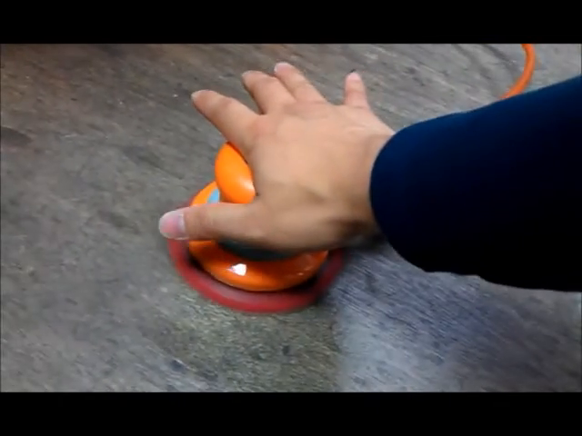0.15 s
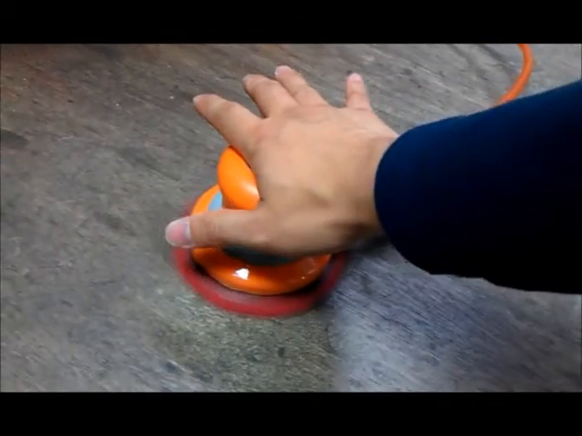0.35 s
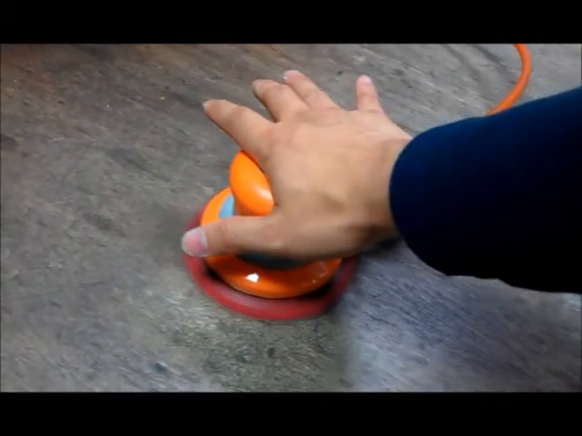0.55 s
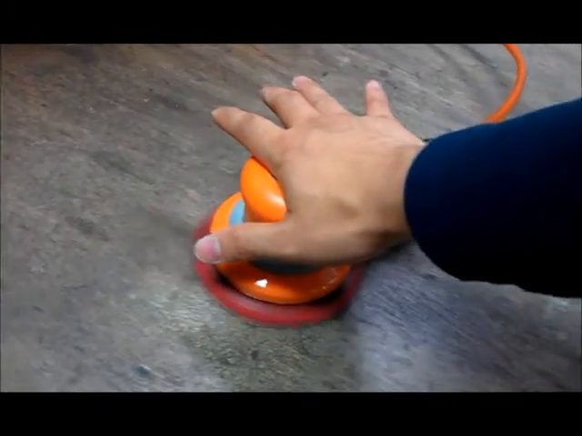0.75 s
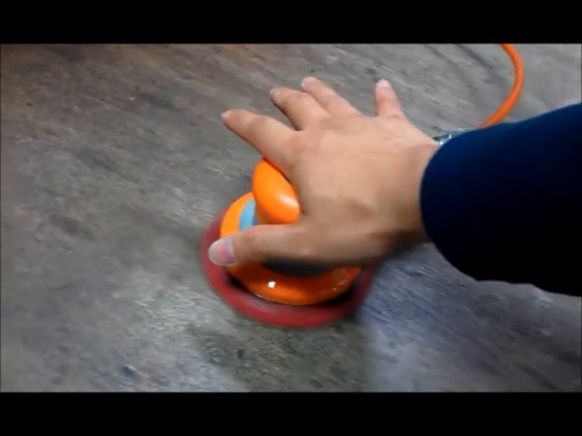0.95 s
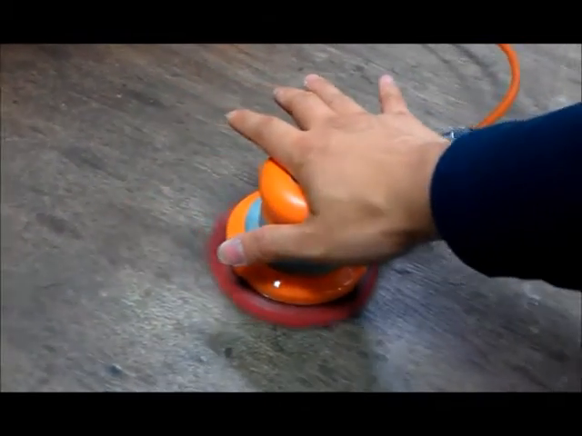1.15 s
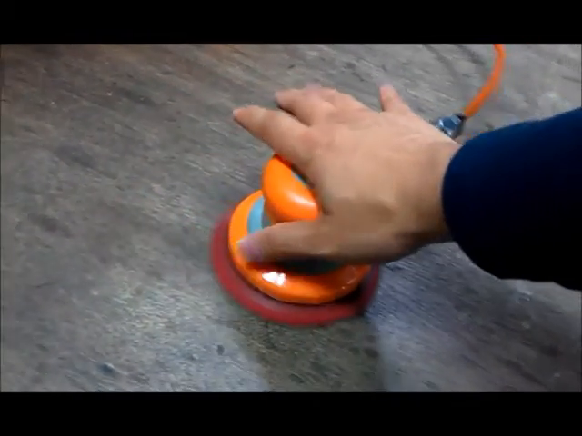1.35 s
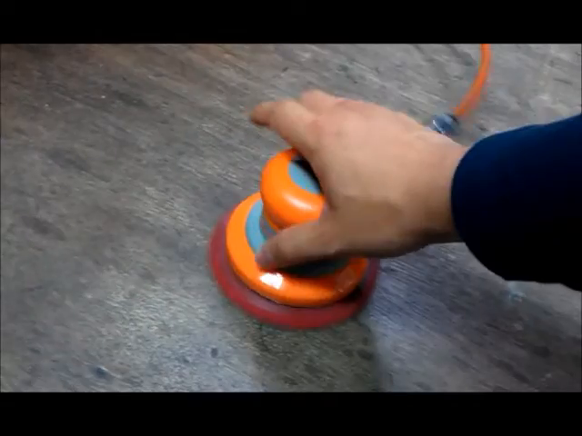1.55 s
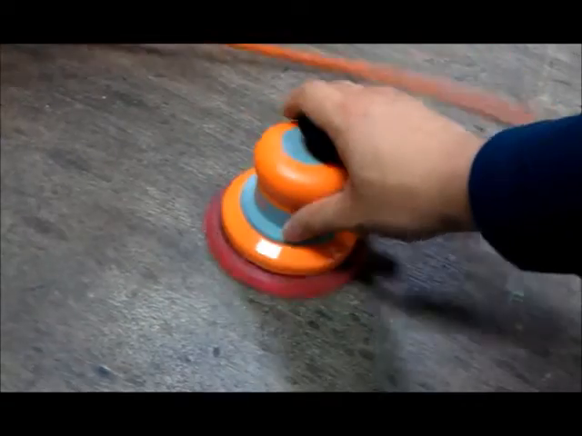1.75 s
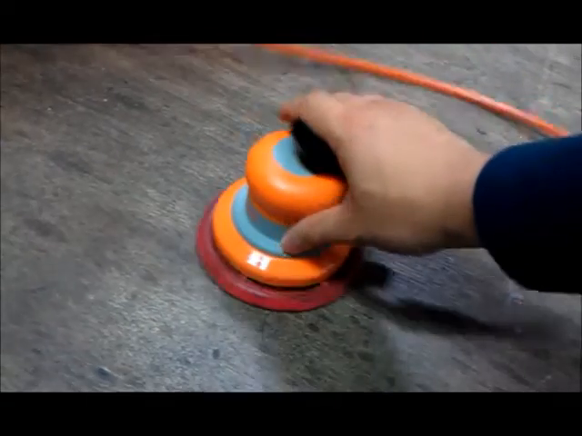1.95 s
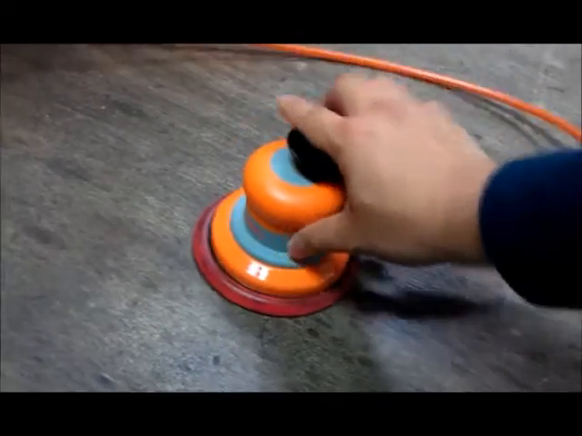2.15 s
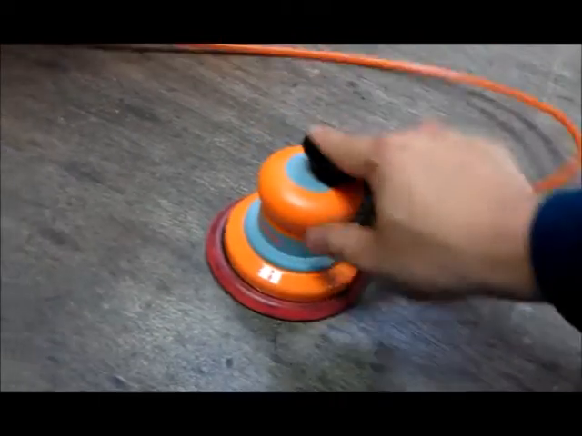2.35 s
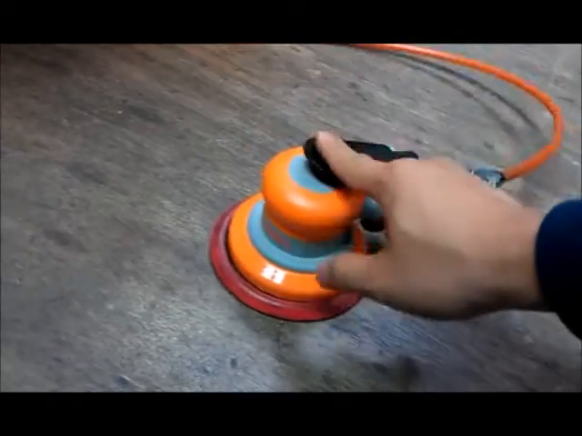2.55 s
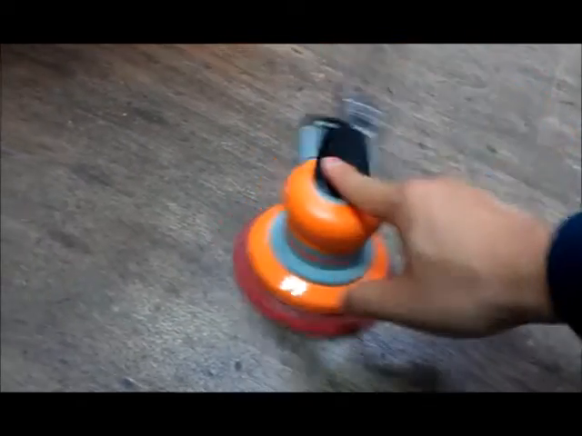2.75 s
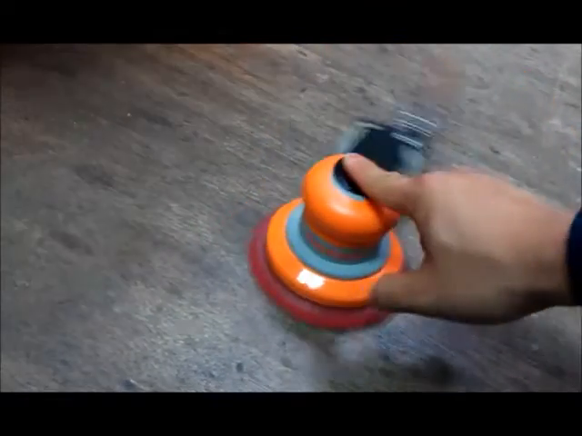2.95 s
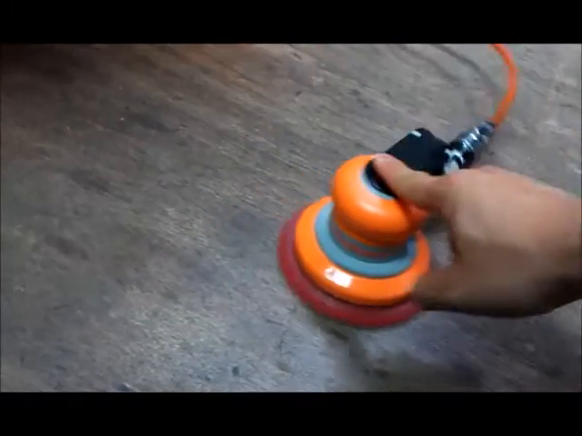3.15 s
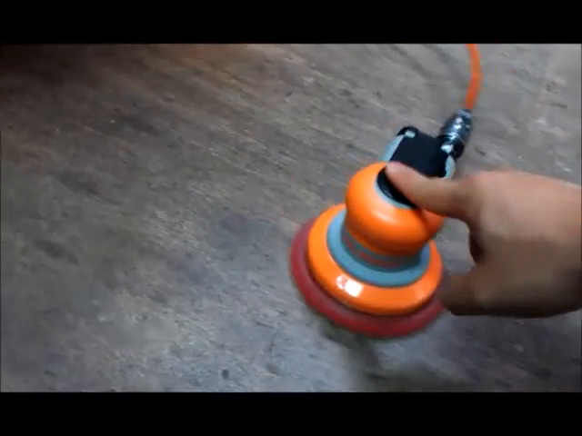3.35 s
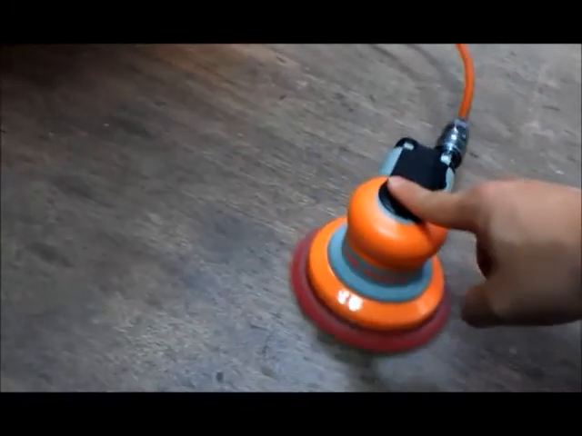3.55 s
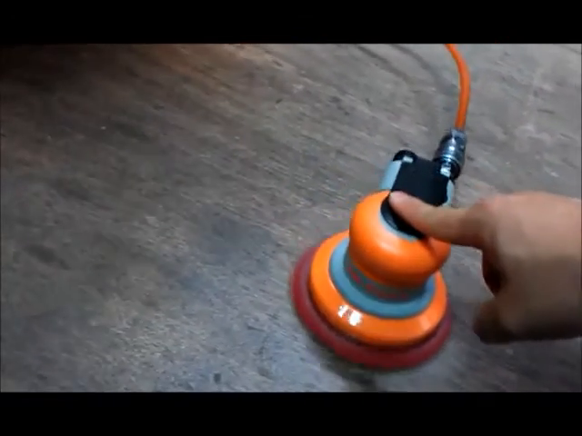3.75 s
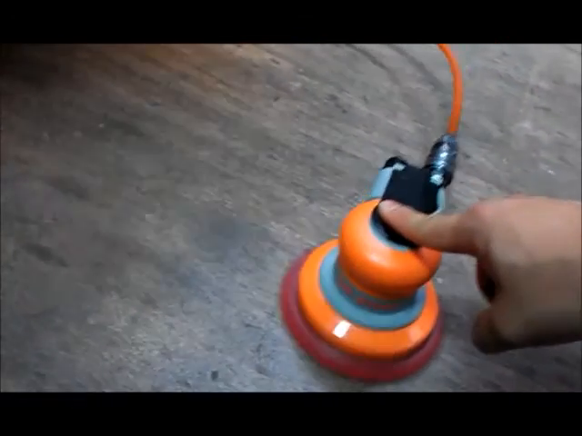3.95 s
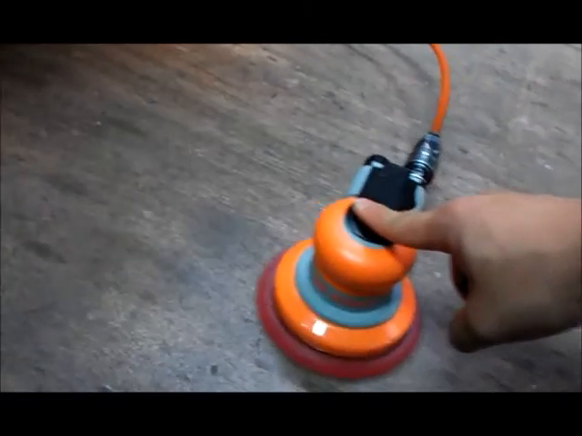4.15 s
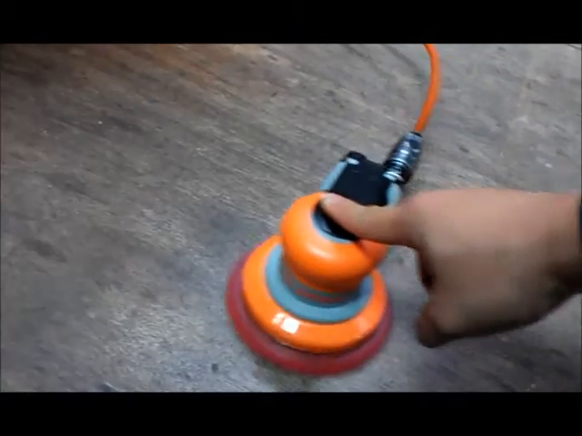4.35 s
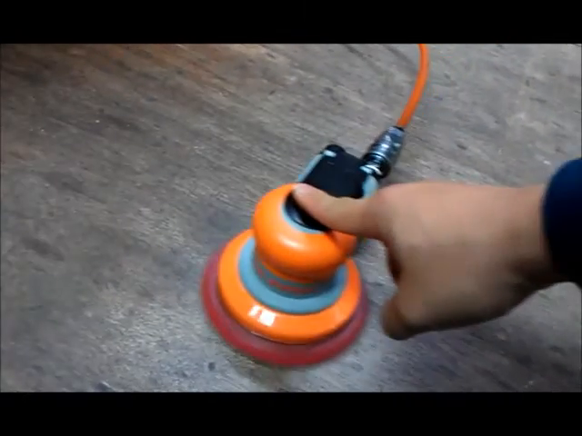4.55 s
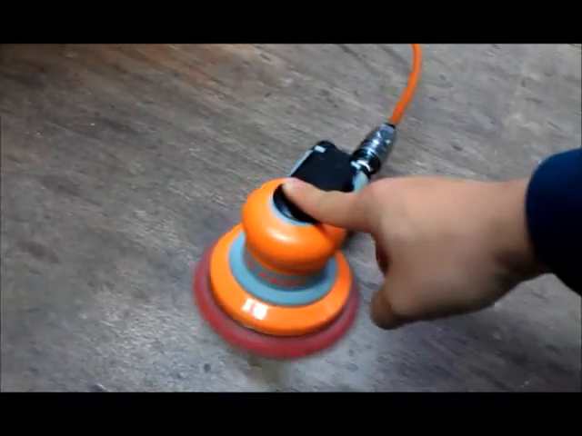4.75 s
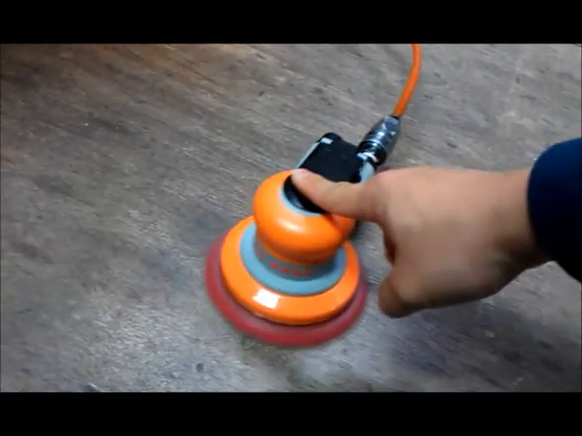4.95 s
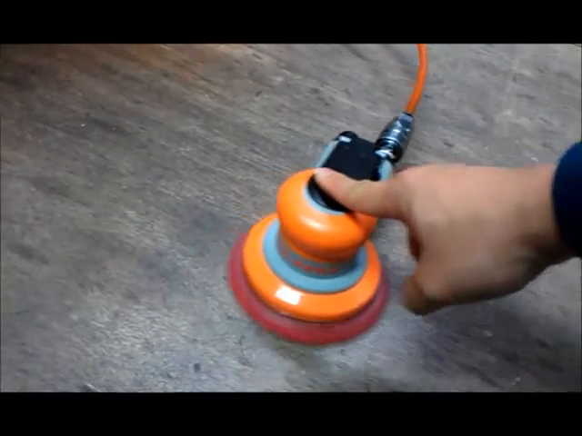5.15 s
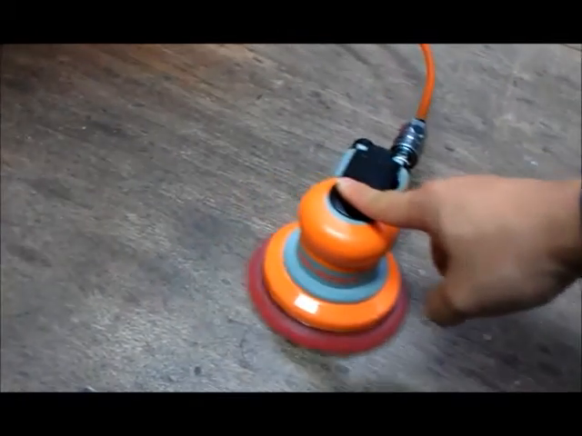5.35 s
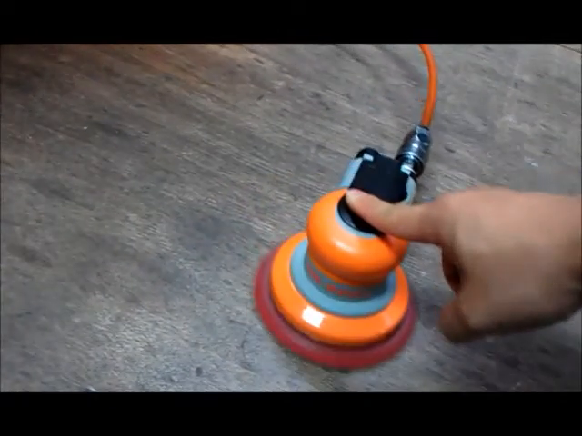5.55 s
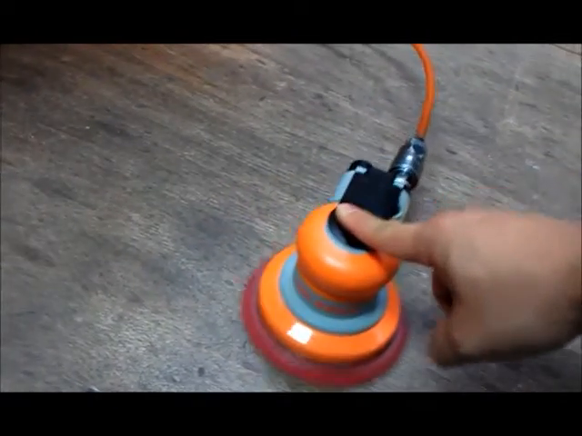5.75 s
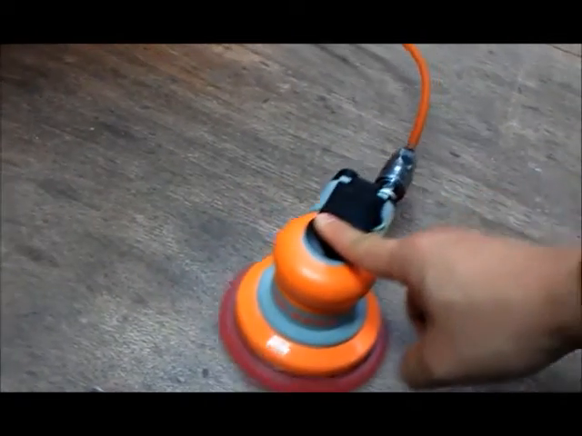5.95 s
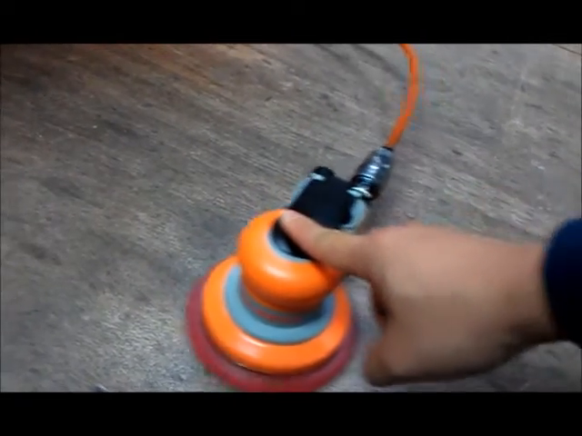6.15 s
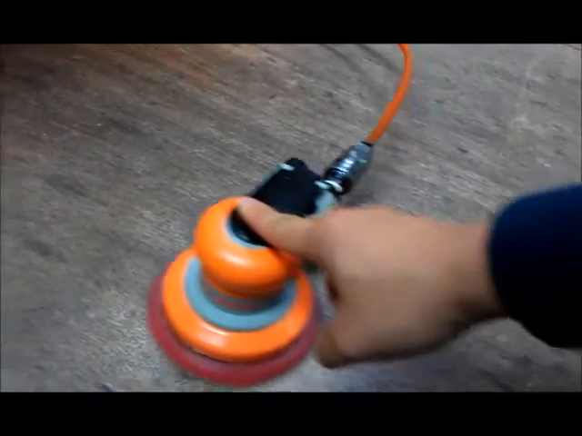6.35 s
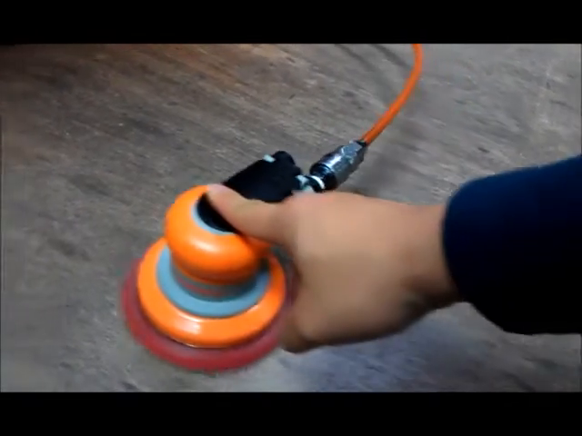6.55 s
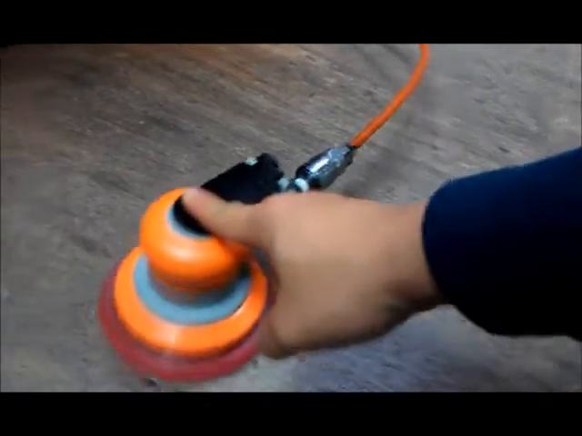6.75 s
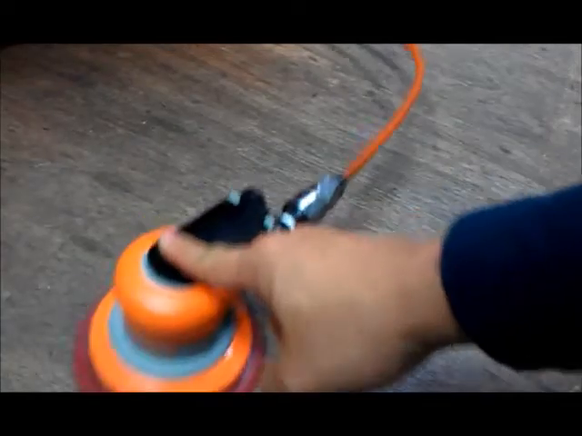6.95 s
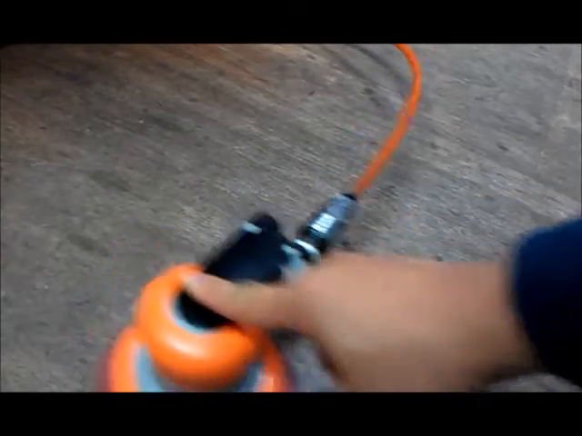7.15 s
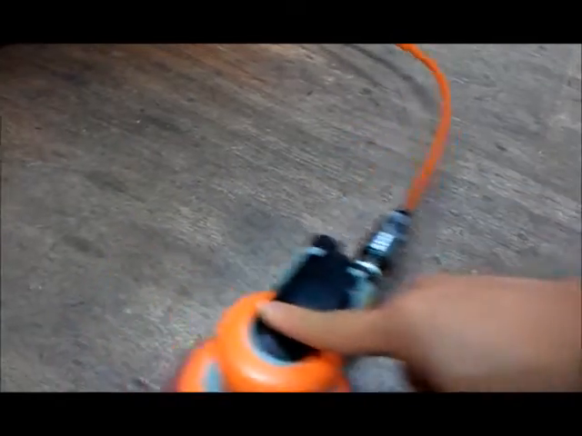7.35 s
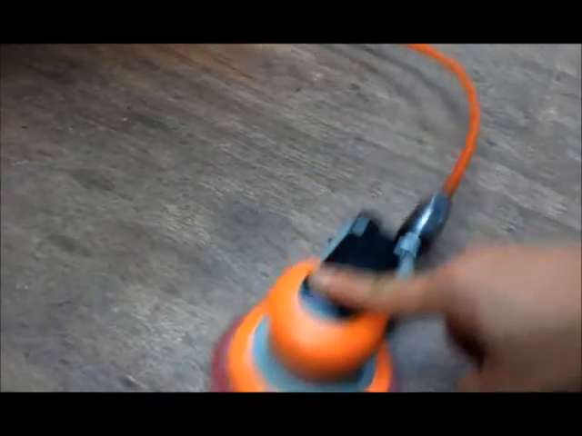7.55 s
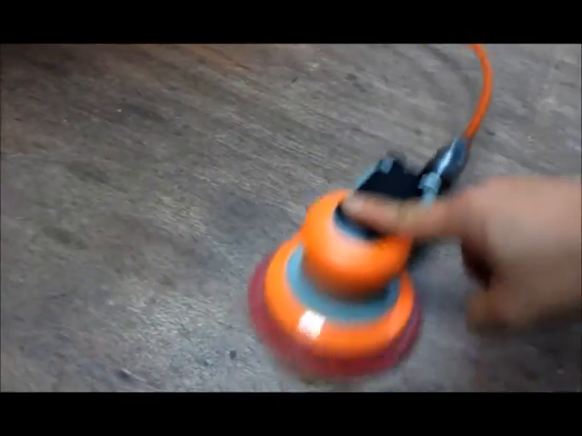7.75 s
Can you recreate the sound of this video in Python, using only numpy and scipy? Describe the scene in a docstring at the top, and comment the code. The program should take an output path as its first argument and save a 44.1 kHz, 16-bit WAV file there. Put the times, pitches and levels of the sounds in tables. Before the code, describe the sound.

A handheld air-powered orbital sander is heard close up on a wooden surface in a workshop, with the same sound on both channels. From 0 to 1.6 s it runs steadily: a whine near 800 Hz with overtones, a rough buzz and low hum at about 160 Hz, metallic bearing tones, bright exhaust hiss and soft scrubbing. Tone colour shifts slightly as the tool moves. At 1.6 s the lever is released; hiss and pitch fall fast, becoming a loose, rattling chug with ticks around 1.9 to 2.05 s, stopping by about 2.2 s. Only faint leaking air and room tone remain. At 2.6 s air returns, small clicks and sharper knocks come between 2.67 and 2.82 s, and the motor rattles and sweeps up to full speed by about 2.9 s. It then whines and hisses steadily until the cut at about 8 s, with gentle wavering and brief whistly swells.

```python
"""A whine over exhaust hiss: a palm-sized pneumatic orbital sander on a wooden bench, heard close by in a workshop.
The whine is summed vane-rate harmonics, the hiss is coloured noise pulsing with the shaft.
The off-centre pad hums and scrubs the wood once a turn; buzz and bearing tones follow the same shaft phase.
The lever is let go, the motor chugs and ticks to a stop, and a second after the release it is started again."""
import sys
import numpy as np
from scipy import signal
from scipy.fft import rfft, irfft, next_fast_len
from scipy.io import wavfile
from scipy.ndimage import map_coordinates

SR = 44100
rng = np.random.default_rng(int(sys.argv[2]) if len(sys.argv) > 2 else 0)


def unload_wav(signal):
    """Save mono or channel-first audio to the path in sys.argv[1] as 16-bit WAV at rate SR, clipped to [-1, 1]."""
    wavfile.write(
        sys.argv[1],
        SR,
        np.round(np.clip(np.atleast_2d(signal).T, -1, 1) * 32767).astype(np.int16),
    )


N = 343539
TIME_S = np.arange(N) / SR
VANES = 5


def undb(db):
    """Decibels to gain."""
    return 10 ** (np.asarray(db) / 20)


def unit(x):
    """Scale to rms 1."""
    return x / np.sqrt(np.mean(x ** 2))


def curves(table):
    """Each column of a timed table, sample by sample."""
    t_s, *columns = np.transpose(table)
    return [np.interp(TIME_S, t_s, column) for column in columns]


def spectrum_at(points, hz):
    """Read (Hz, dB) points on a log-frequency axis."""
    f_hz, db = np.transpose(points)
    return np.interp(np.log(np.maximum(hz, 1)), np.log(f_hz), db)


def noise(points):
    """Noise of a given colour, rms 1."""
    size = next_fast_len(N, True)
    gain = undb(spectrum_at(points, np.fft.rfftfreq(size, 1 / SR)))
    white = rng.standard_normal(size)
    return unit(irfft(rfft(white) * gain, size)[:N])


def walk(rate_hz):
    """Smooth chance that changes about rate_hz times a second; spread near 1."""
    steps = rng.standard_normal(4096)
    coarse_s = TIME_S[::64]
    smooth = map_coordinates(steps, [coarse_s * rate_hz], order=3, mode="wrap")
    return np.interp(TIME_S, coarse_s, smooth)


RELEASE_S, PRESS_S, VALVE_OPENS_S = 1.61, 2.62, 0.14
# coasting: pressure fade, slowing time constant, dry friction (share of full speed) that ends it
EASE_S, COAST_S, FRICTION = .009, .15, .025
# S-curve run-up: press to half speed, time constant
HALF_SPEED_S, RUN_UP_S = .121, .033


def throttle():
    """Shares of full speed and full air flow: both die away after the release and return with the press."""
    since_s = EASE_S * np.logaddexp(0, (TIME_S - RELEASE_S) / EASE_S)
    coast = np.maximum(np.exp(-since_s / COAST_S) - FRICTION, 0) / (1 - FRICTION)
    run_up = (1 + np.tanh((TIME_S - PRESS_S - HALF_SPEED_S) / (2 * RUN_UP_S))) / 2
    valve = np.clip((TIME_S - PRESS_S) / VALVE_OPENS_S, 0, 1)
    pace = np.where(TIME_S < PRESS_S, coast, run_up)
    flow = coast ** 1.03 + valve ** 2.4
    return pace, flow


# shaft speed with the valve open, following the load on the pad: t/s, f/Hz
OPEN_SPEED = [(0.0, 159.5), (0.55, 160.0), (0.8, 159.4), (1.1, 160.2), (1.5, 160.0), (3.1, 158.7),
              (3.85, 159.5), (4.35, 159.8), (4.7, 160.6), (5.3, 160.1), (5.85, 160.9), (6.4, 161.0),
              (6.6, 160.4), (7.1, 160.7), (7.75, 160.6)]


def shaft_hz(pace):
    """Loaded open-valve speed, scaled by the share of full speed."""
    open_hz, = curves(OPEN_SPEED)
    return open_hz * pace


# vanes passing the exhaust port, as the tool is steered: t/s, 1st, 2nd, 3rd harmonic mean level/dB
VANE_WHINE = [(0.0, -31, -37.5, -42), (0.5, -33.5, -38.5, -45), (1.0, -38, -41, -43),
              (1.5, -34.5, -39, -56), (2.95, -34.5, -37, -47), (3.7, -33.5, -33.5, -40.5),
              (4.25, -36, -37, -42), (4.75, -35, -43.5, -42.5), (5.5, -35, -35.5, -41),
              (6.1, -38.5, -42.5, -48), (6.55, -34, -37, -52), (7.05, -31.5, -53, -43.5),
              (7.4, -36, -35.5, -48), (7.75, -37, -36.5, -44.9)]


def whine(turns, pace, loose, waver_db=0.54):
    """The first harmonics of the vane rate, clean while air holds the vanes against the wall."""
    tones = np.zeros(N)
    for k, db in enumerate(curves(VANE_WHINE), 1):
        tones += undb(db + waver_db * walk(25)) * np.cos(2 * np.pi * VANES * k * turns + k)
    return np.sqrt(2) * tones * pace * (1 - loose)


# exhaust jet colour: f/Hz, relative level/dB per Hz
JET_COLOUR = [(300, -23), (900, -11.5), (1700, -5), (2200, -6.5), (2800, -3), (3400, -1.5), (4100, -2.5),
              (5000, -1.5), (6100, 1.5), (7200, -0.5), (8500, -4.5), (10500, -5), (12500, -10.5),
              (15500, -10)]
LEAK_DB = -70.5  # air seeping past the closed valve, below the split


def hiss(turns, flow, air_db, top_db, pulsing=0.1, split_hz=9500, top_trim_db=7.0, leak_top_db=9.0,
         jet_trim_db=-0.42, flicker_db=0.71):
    """The exhaust jet pulses with shaft and vanes; its top changes as the port turns, and a thin leak stays."""
    jet = noise(JET_COLOUR)
    low = signal.sosfiltfilt(signal.butter(3, split_hz, fs=SR, output="sos"), jet)
    top = jet - low
    # the pad rocks over two turns, so the load also beats at half the shaft rate
    puffs = 1 + pulsing * sum(np.cos(2 * np.pi * k * turns + k * k) for k in (.5, 1, 2, VANES))
    level = undb(air_db + jet_trim_db + flicker_db * walk(30))
    blast = (low + undb(top_db + top_trim_db) * top) * puffs * level
    leak = undb(LEAK_DB) * (low + undb(leak_top_db) * top)
    return flow * blast + leak


def hum(turns, pace, hum_db=-39.5):
    """The off-centre pad shakes the tool once a turn; force and radiation both fall away with speed."""
    radiated = pace ** 5
    return np.sqrt(2) * undb(hum_db) * radiated * np.sin(2 * np.pi * turns)


# pad on the wood: f/Hz, relative level/dB per Hz
SCRUB_COLOUR = [(30, -44), (90, -42), (260, -26), (360, -17), (480, -25.5), (620, -5), (830, -6.5),
                (1080, 2), (1220, -1), (1500, -4.5), (1800, -19), (3000, -25)]


def scrub(turns, scrub_db, throb=0.16, rocking=0.2, trim_db=-1.5, patchy_db=0.5):
    """The pad rubs the wood harder on one side of each orbit, and harder on every second turn."""
    pressure = 1 + throb * np.sin(2 * np.pi * turns) + rocking * np.sin(np.pi * turns)
    return noise(SCRUB_COLOUR) * pressure * undb(scrub_db + trim_db + patchy_db * walk(22))


# gap between port and bench picks out one shaft harmonic: start t/s, length/s, multiple of shaft speed, boost/dB
GAP_WHISTLES = [(-.3, 1, 36, 10.5), (0, 1.0, 28, 15), (3.3, 1.5, 40, 5.5), (3.55, .5, 38, 7),
                (4.45, 0.45, 36, 11.5), (5.0, .6, 38, 11), (5.55, .55, 40, 9.5), (5.6, 0.62, 21, 2.5),
                (5.8, 1.3, 36, 8), (7.3, 0.79, 40, 7)]


def whistle_db(k):
    """Boost of shaft harmonic k: each brief whistle swells and fades in one arch."""
    boost_db = 0
    for start_s, length_s, multiple, peak_db in GAP_WHISTLES:
        if round(multiple) == k:
            boost_db += peak_db * np.sin(np.pi * np.clip((TIME_S - start_s) / length_s, 0, 1))
    return boost_db


# exhaust puffs, one shaft harmonic before beam, whistles and swell: f/Hz, level/dB
PUFF_BUZZ = [(320, -69), (480, -59.5), (640, -56), (1000, -47), (1450, -51), (1800, -56), (2200, -59),
             (2600, -51), (3400, -46), (4300, -53), (6100, -45.5), (7500, -53), (11000, -66), (12200, -56),
             (15500, -60)]
# upper whine, all five vanes adding up, same reference: multiple of shaft speed, level/dB
UPPER_WHINE = [(20, -44), (25, -52), (30, -50), (35, -45), (40, -44), (45, -52), (50, -53), (55, -59),
               (60, -54), (65, -52), (70, -62), (75, -49), (80, -49), (85, -52), (90, -50.5), (95, -55)]
# how squarely the port beams its buzz at the listener: t/s, gain below split/dB, gain above split/dB
PORT_BEAM = [(0, -2.5, -1.5), (1.2, 1, -1), (2.95, -4, -2.5), (4.2, -1.5, 1), (5.9, 1, 0.5),
             (6.7, -3.5, -0.5), (7.75, -0.5, 0.5)]
BEAM_SPLIT_HZ = 4200


def buzz(turns, full_hz, swell_db=2.4, count=97):
    """Unequal vanes puff out shaft harmonics; each swells and fades as the tool slides on the reflecting bench."""
    angle = 2 * np.pi * ((turns + .0005 * walk(40)) % 1)
    overtones = dict(UPPER_WHINE)
    mid_db, treble_db = curves(PORT_BEAM)
    out = np.zeros(N)
    for k in range(2, count + 1):
        if k % VANES == 0 and k not in overtones:
            continue  # the lowest vane harmonics are the whine
        beam_db = mid_db if k * full_hz < BEAM_SPLIT_HZ else treble_db
        base_db = overtones.get(k, spectrum_at(PUFF_BUZZ, k * full_hz))
        level_db = base_db + beam_db + whistle_db(k) + swell_db * walk(1.8)
        phase = k * angle + 2 * np.pi * rng.random()
        out += undb(level_db.astype(np.float32)) * np.sin(phase.astype(np.float32))
    return np.sqrt(2) * out


# tones between the shaft harmonics: multiple of shaft speed, mean level at full speed/dB
BEARING_TONES = [(1.495, -64.5), (5.6, -62), (5.84, -51.5), (6.655, -47.5), (6.784, -47), (6.16, -69),
                 (7.38, -50), (8.51, -50.5), (9.1, -43), (13.8, -92), (19.96, -55), (20.16, -57),
                 (21.02, -60), (21.9, -48.5), (23.07, -47.5), (32, -66)]


def bearings(turns, slip_cycles=0.13, swell_db=1.0):
    """Rolling balls sing off the shaft harmonics and slip a little."""
    out = np.zeros(N)
    for ratio, db in BEARING_TONES:
        level = undb(db + swell_db * walk(1.98))
        out += level * np.sin(2 * np.pi * (ratio * turns + slip_cycles * walk(14)))
    return np.sqrt(2) * out


# chamber and housing resonances swept by the chug, before harmonic slope and chatter: f/Hz, level/dB
CHAMBER_RESONANCES = [(110, -47), (290, -37.5), (365, -21.5), (460, -32.5), (570, -22.5), (700, -19),
                      (880, -25), (1120, -10.5), (1370, -20), (1550, -21), (1750, -19), (2300, -23)]
DRIVEN_CHUG_DB = -6.5  # softer when air drives the vanes


def chug(turns, hz, pace, loose, slope_db_per_octave=-7.0, chatter_db=4.0, chatter_turns=0.011, count=3):
    """Loose vanes pump roughly; their harmonics glide through the chamber's resonances and fade with speed."""
    out = np.zeros(N)
    for k in range(1, count + 1):
        resonance_db = spectrum_at(CHAMBER_RESONANCES, k * VANES * hz)
        db = resonance_db + slope_db_per_octave * np.log2(k) + chatter_db * np.tanh(walk(110))
        slipped = turns + chatter_turns * walk(150)
        out += undb(db) * np.cos(2 * np.pi * VANES * k * slipped + k)
    return np.sqrt(2) * out * pace * loose * undb(DRIVEN_CHUG_DB * (TIME_S > PRESS_S))


# housing and pad modes: f/Hz, relative level/dB, t60/s
BODY_MODES = [(380, -13, .03), (680, -10, .025), (1060, 0, .04), (1190, -1, .04), (1330, -8, .03),
              (2600, -9, .012), (3400, -9, .015)]


def body_ring(contact_s=.001):
    """What housing and pad ring with after one slightly cushioned blow, peak 1."""
    t = TIME_S[:SR // 10]
    ring = np.zeros(len(t))
    for hz, db, t60_s in BODY_MODES:
        ring += undb(db) * np.sin(2 * np.pi * hz * t) * np.exp(-np.log(1000) * t / t60_s)
    ring *= (1 - np.exp(-t / contact_s)) ** 2
    return ring / np.abs(ring).max()


# vane edges rasping on the cylinder wall: f/Hz, relative level/dB per Hz
RASP_COLOUR = [(1000, -19), (1900, -3), (2700, -2), (3400, 0), (5000, -25), (12000, -30)]
SLAP_DB = -35.5


def slaps(turns, hz, scatter_db=1.5, rasp_db=6.5):
    """One blow on the housing and a short rasp for each passing vane."""
    passes = np.diff(np.floor(VANES * turns), prepend=0)
    blows = passes * undb(scatter_db * rng.standard_normal(N))
    ring = body_ring()
    power = np.sum(ring ** 2) * VANES * np.maximum(hz, 10) / SR
    rattle = signal.fftconvolve(blows, ring)[:N] / np.sqrt(power)
    rasp = noise(RASP_COLOUR) * (1 + np.cos(2 * np.pi * VANES * turns) / 2) * hz / hz.max()
    return (rattle + undb(rasp_db) * rasp) * undb(SLAP_DB)


# blows of vanes, lever and pad: t/s, ring level/dB, crack level/dB, crack time constant/s
BLOWS = [(1.857, -35, -42, .012), (1.9, -44, -44, .01), (1.96, -47, -45, .014), (2.04, -47, -48, .009),
         (2.674, -40, -47, .003), (2.698, -31, -48, .004), (2.747, -34, -23, .004),
         (2.8115, -17, -34, .003), (2.8205, -24, -20, .004)]


def knocks():
    """Single blows: the body rings and a short bright crack goes with it."""
    out, ring, grit = np.zeros(N), body_ring(), noise(JET_COLOUR)
    for t_s, ring_db, crack_db, crack_s in BLOWS:
        start = int(t_s * SR)
        span = slice(start, start + len(ring))
        crack = np.exp(-TIME_S[:len(ring)] / crack_s) * grit[span]
        out[span] += undb(ring_db) * ring + undb(crack_db) * crack
    return out


def workshop(x, wet_db, t60_s=.5):
    """A short diffuse tail from the walls."""
    t = TIME_S[:SR // 2]
    tail = rng.standard_normal(len(t)) * np.exp(-np.log(1000) * t / t60_s) * (t > .006)
    return x + undb(wet_db) * signal.fftconvolve(x, tail / np.linalg.norm(tail))[:N]


# room tone colour: f/Hz, relative level/dB per Hz
ROOM_COLOUR = [(15, -37), (25, -21), (71, -8.5), (169, -1.5), (215, -4), (267, -7), (313, -2), (445, -7),
               (703, -5), (1490, -8.5), (3440, -16), (10100, -21), (15500, -27)]
ROOM_TONE_DB = -53


def room_tone():
    """Steady coloured noise of the room."""
    return undb(ROOM_TONE_DB) * noise(ROOM_COLOUR)


# valve open, before trims: t/s, exhaust air level/dB, treble relative to it/dB, scrub level/dB
AIR_AND_SCRUB = [(0.0, -26, -9, -33.9), (0.9, -26.5, -7.5, -34), (1.5, -27.4, -12.5, -36),
                 (2.95, -27, -7, -34.5), (3.9, -26.0, -8.2, -33), (4.5, -27.5, -10.5, -36.8),
                 (5.6, -26.5, -8.4, -34.5), (6.4, -27.0, -10.5, -38), (7.05, -27, -9.5, -33),
                 (7.7, -24.5, -11.5, -40)]
LOOSE_BELOW = 0.18  # share of speed lost at which the vanes are fully loose
LOOSE_SCRUB_DB = 8  # extra scrub as the coasting pad wobbles


def scene():
    """The lever sets shaft speed and air flow, and these drive every part of the tool."""
    pace, flow = throttle()
    hz = shaft_hz(pace)
    turns = np.cumsum(hz) / SR
    loose = np.clip((1 - pace) / LOOSE_BELOW, 0, 1)
    coasting = loose * (TIME_S < PRESS_S)
    air_db, top_db, scrub_db = curves(AIR_AND_SCRUB)

    vanes = whine(turns, pace, loose) + chug(turns, hz, pace, loose)
    rush = hiss(turns, flow, air_db, top_db)
    rush += pace ** 1.3 * scrub(turns, scrub_db + LOOSE_SCRUB_DB * coasting)
    motor = flow * pace * buzz(turns, np.median(hz)) + pace ** 2 * bearings(turns)
    motor += pace * loose * slaps(turns, hz) + knocks()

    sound = workshop(motor, wet_db=-7.0) + workshop(vanes, wet_db=-17) + hum(turns, pace) + rush
    return np.tile(sound + room_tone(), (2, 1))  # same signal on both channels


def record(dry, low_cut_hz=74.0, top_hz=15700):
    """The recorder cuts the deep bass and the top."""
    thin = signal.sosfilt(signal.butter(2, low_cut_hz, "high", fs=SR, output="sos"), dry)
    return signal.sosfilt(signal.ellip(12, .1, 80, top_hz, fs=SR, output="sos"), thin)


dry = scene()
out = record(dry)
unload_wav(out)
```